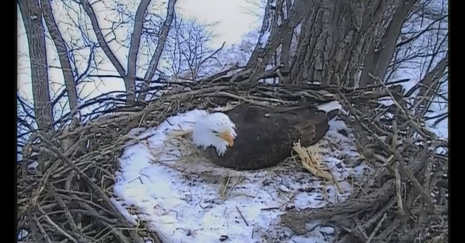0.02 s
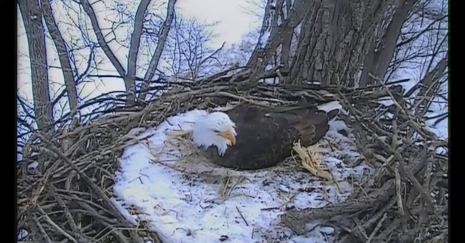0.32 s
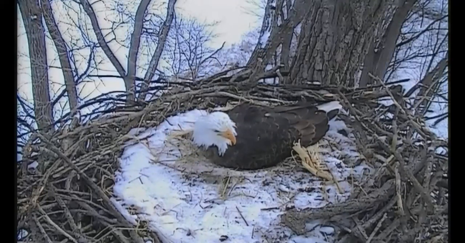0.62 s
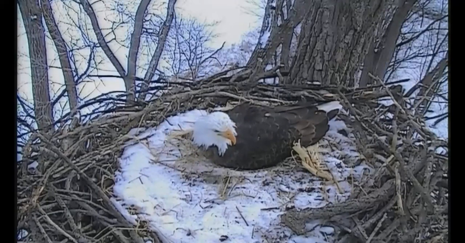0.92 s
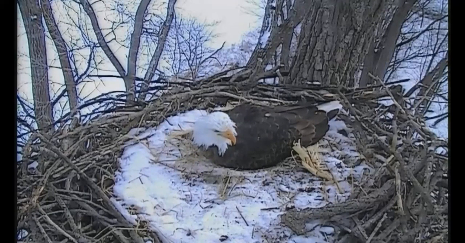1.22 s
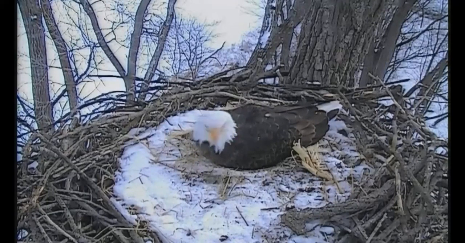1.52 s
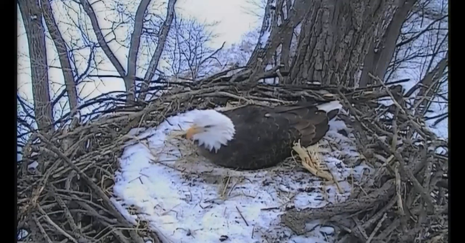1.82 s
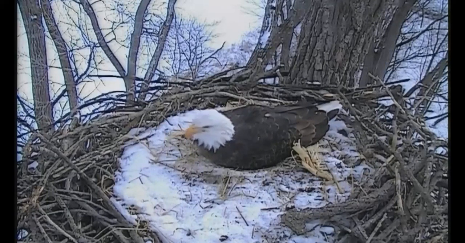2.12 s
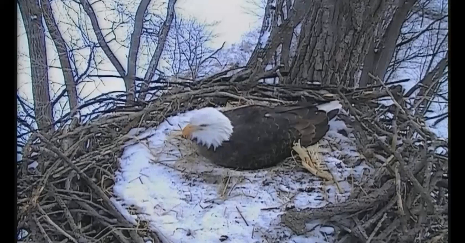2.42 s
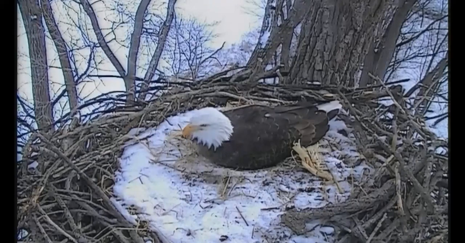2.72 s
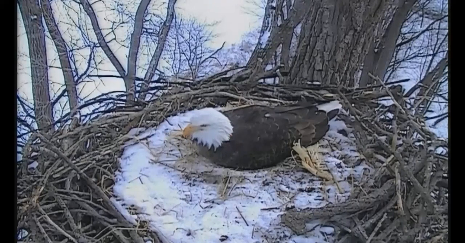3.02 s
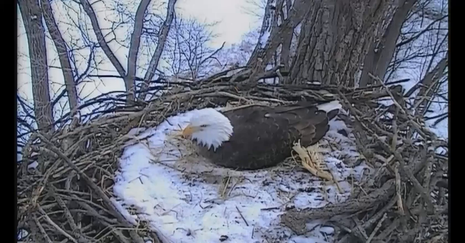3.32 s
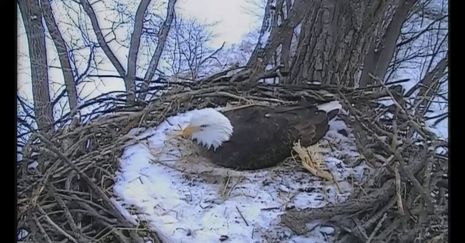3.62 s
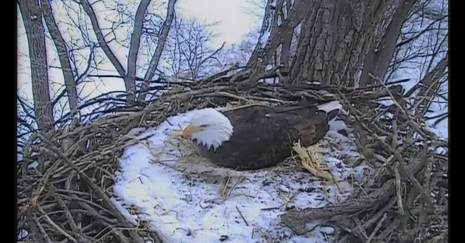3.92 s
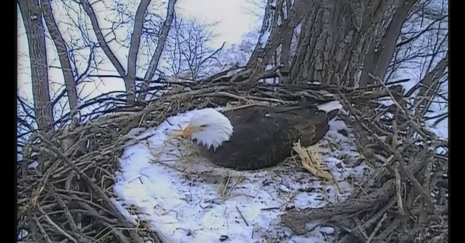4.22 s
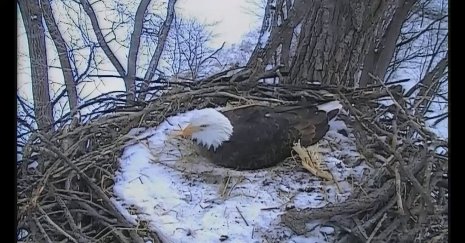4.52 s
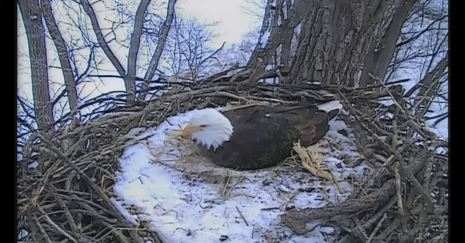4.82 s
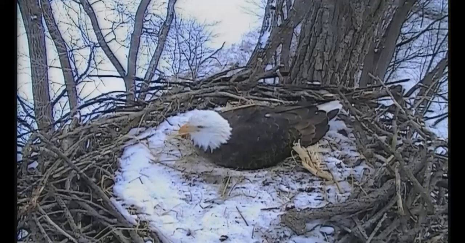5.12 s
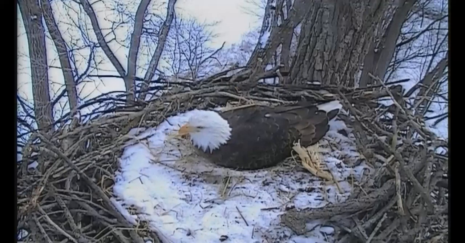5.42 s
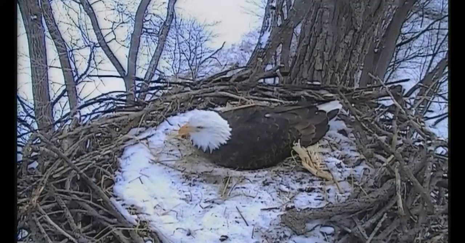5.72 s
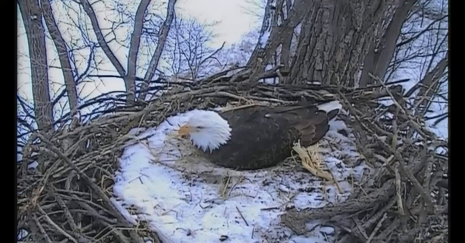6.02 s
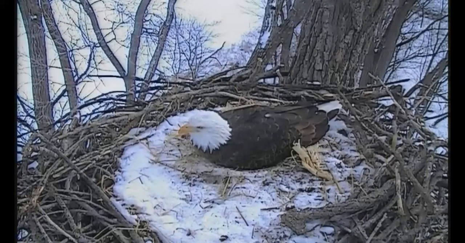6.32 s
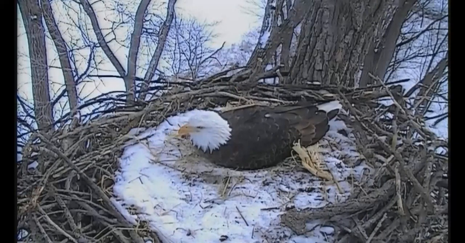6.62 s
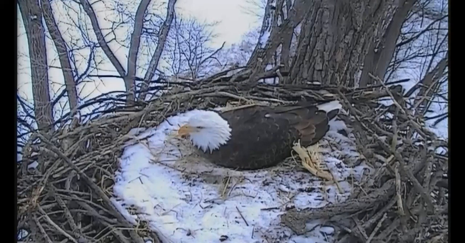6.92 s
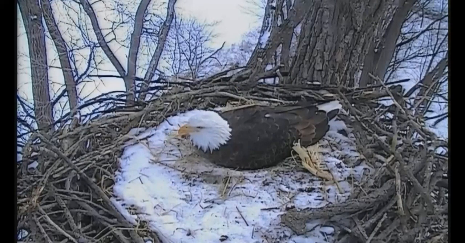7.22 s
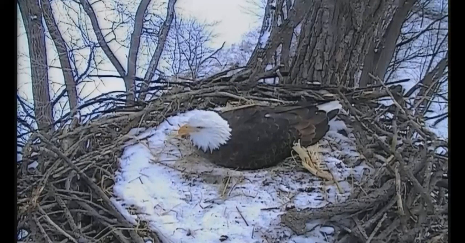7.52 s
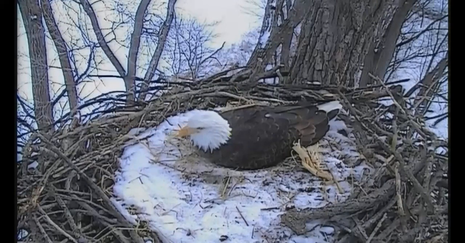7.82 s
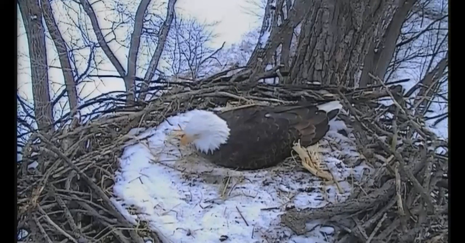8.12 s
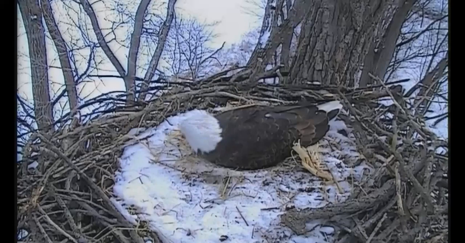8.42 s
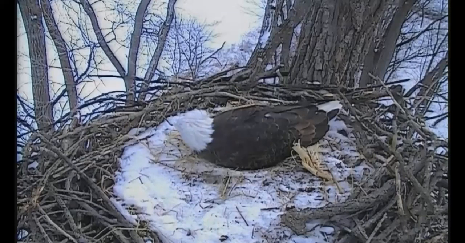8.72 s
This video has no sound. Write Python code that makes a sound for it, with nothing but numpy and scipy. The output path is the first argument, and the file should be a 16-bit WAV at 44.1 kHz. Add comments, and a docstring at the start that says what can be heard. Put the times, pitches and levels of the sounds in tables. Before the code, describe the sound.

Faint, high songbird chirps and a repeated husky phrase come from the woods around a treetop nest, then thin out. Later a far bird repeats falling calls, a knock sounds on wood, and a nearer bird briefly whistles, trills and rasps. Distant road noise and an engine drone swell gently underneath. The fixed microphone adds a constant low buzz, a thin whine and hiss, and the birds stay quiet against them.

```python
"""Songbirds over far traffic, with camera buzz.

Small birds whistle, trill, chirp and rasp in echoing trees; two soft taps ring in wood.
Far traffic roars and one distant engine drones. A camera's picture signal leaks into its sound
line: a low buzz at the field rate and a thin whine chopped at that rate, over mains hum and hiss."""
import sys
import numpy as np
from scipy import signal
from scipy.fft import rfft, irfft, next_fast_len
from scipy.io import wavfile
from scipy.ndimage import uniform_filter1d, map_coordinates

SR = 44100
rng = np.random.default_rng(int(sys.argv[2]) if len(sys.argv) > 2 else 0)


def output_pcm(signal):
    """Save a mono or channel-first signal as 16-bit PCM at the path in sys.argv[1].

    Samples are clipped to [-1, 1] before scaling.
    """
    pcm = np.clip(np.atleast_2d(signal).T, -1, 1) * 32767
    wavfile.write(sys.argv[1], SR, np.round(pcm).astype(np.int16))


N = 396018
TIME_S = np.arange(N) / SR
FIELD_HZ, MAINS_HZ = 59.94, 59.97

# One curve per whistle. Each row: time in seconds, pitch in Hz, level in dB.
WHISTLE_CURVES = [
    [(0.0, 7370, -62), (0.004, 7228, -64), (0.022, 7173, -51), (0.09, 7313, -49), (0.105, 7173, -54)],
    [(7.082, 7553, -65), (7.088, 7625, -53), (7.136, 7630, -50), (7.17, 8340, -46), (7.186, 8350, -37),
     (7.354, 8366, -59), (7.36, 8354, -62)],
    [(7.148, 6000, -60), (7.158, 5881, -43), (7.174, 5401, -48), (7.206, 5277, -53), (7.236, 5390, -58)],
    [(7.392, 4930, -61), (7.406, 5100, -48), (7.488, 5900, -45), (7.51, 5986, -54), (7.62, 6074, -49)],
    [(7.455, 10800, -58), (7.477, 10373, -49), (7.543, 9700, -50), (7.587, 10100, -46.5),
     (7.611, 9758, -46), (7.62, 9600, -61)],
]
# Trill and its lower side tone. Each row: pitch in Hz, level in dB.
TRILL_TONES = [(6000, -55), (4650, -59)]
# Bird rasps. Each row: start in seconds, level in dB.
RASP_TICKS = [(3.817, -54), (7.048, -42.5), (7.236, -44.5), (7.661, -44)]
RASP_HISSES = [(1.63, -61), (2.04, -66), (7.15, -57), (7.71, -56), (7.88, -55.5), (8.06, -58)]
# Rasp colours. Each row: frequency in Hz, gain in dB.
THROAT_SPECTRUM = [(1200, -3), (2700, -15), (3500, -3), (4500, -2), (5600, -6.5), (6500, -15), (9000, -32)]
SIBILANCE_SPECTRUM = [(3000, -40), (6500, -9), (8200, -1), (10000, 3), (11000, -8)]
# Each row: start and length in seconds, first and last pitch in Hz, relative dB, roughness as a share.
CHIRP_NOTES = [(.097, .025, 7400, 6500, -54, .01), (.97, 0.061, 2170, 2200, -57, .006),
               (1.92, .045, 8350, 8380, -55, .006), (1.92, .045, 9400, 9550, -59, .01),
               (1.976, .055, 5000, 6000, -49, .015), (2.05, .06, 7600, 8800, -58, .04),
               (2.075, .06, 6300, 7100, -55, .03), (2.48, .06, 4400, 5300, -63, .03),
               (7.364, 0.0088, 5800, 5250, -44, .006), (7.619, .036, 6400, 7850, -46, .008)]
# Each row: delay and length in seconds, first and last pitch in Hz, relative level in dB.
PHRASE_NOTES = [(0, .05, 4300, 5450, -9), (.03, .05, 6900, 8450, -7.5), (.07, .047, 4400, 3850, -1.5),
                (.13, 0.035, 3480, 3170, -6)]
# Each row: start in seconds, relative level in dB.
PHRASE_REPEATS = [(.451, -56), (1.048, -52.5), (1.628, -56)]
# Runs of falling calls. Each row: start, end and spacing in seconds, relative level in dB.
FAR_CALL_RUNS = [(5.74, 6.7, .175, -60), (7.11, 7.85, .3, -63)]
# Single falling calls. Each row: start in seconds, first pitch in Hz, level in dB.
FAR_SINGLE_CALLS = [(.3, 2830, -64), (5.01, 3500, -65), (5.46, 3560, -57), (8.34, 2713, -62)]
# Each row: start in seconds, ring in Hz, level in dB, 60 dB decay time in seconds.
WOOD_TAPS = [(3.826, 1270, -36, 0.077), (7.333, 587, -16, .035)]
# Traffic swell. Each row: time in seconds, tyre level in dB.
TYRE_LEVELS = [(0, -32), (.6, -34.5), (2.9, -37), (4.3, -35.5), (6.1, -31), (6.8, -35.5), (7.4, -34),
               (8.1, -31), (9, -32)]
# Traffic colours. Each row: frequency in Hz, gain in dB.
RUMBLE_SPECTRUM = [(4, -20), (10, -18.5), (20, 2), (32, 12), (45, -3), (75, 8), (130, -2.5), (300, -43.5)]
ROAR_SPECTRUM = [(40, -19), (130, 0), (230, 0), (420, 0.5), (500, -6), (700, -12.5), (1200, -29),
                 (2500, -41.5), (6000, -73)]
TYRE_SPECTRUM = [(250, -31), (430, -13.5), (500, -1.5), (560, -0.5), (680, -4.5), (800, -12), (950, -17.5),
                 (1200, -23.5), (1500, -34.5), (2500, -45), (6000, -70)]
# Each row: time in seconds, firing rate in Hz, level in dB.
ENGINE_CURVE = [(0, 100.5, -32.5), (1.4, 99.76, -37), (2.25, 95.27, -32), (3.6, 88.5, -32),
                (4.5, 87.5, -38.5), (6.6, 86, -38.5), (8.2, 93.7, -33.5), (9, 94, -33)]
# Picture signal's path into the sound line. Each row: frequency in Hz, gain in dB.
LEAK_RESPONSE = [(15, -28), (60, 0), (120, 0), (180, -5.5), (240, -6), (360, -10.5), (540, -12), (760, -18),
                 (1150, -14.5), (1600, -29.5), (2050, -22.5), (2800, -26.5), (4200, -21.5), (5200, -24.5),
                 (10000, -24.5)]
# Brightness down the picture. Each row: time from blanking onset in ms, relative gain.
SCAN_BRIGHTNESS = [(.7, 0.081), (1.1, 0.68), (3.2, 1), (5.5, 0.77), (6.3, 0.17), (7.5, 0.58), (10, 0.42),
                   (10.8, 0.79), (11.8, 0.41), (12.4, 0.42), (13.3, 0.76), (14.2, 0.27)]
# Each row: harmonic number, level in dB.
MAINS_HARMONICS = [(1, -39), (3, -38.5), (5, -52)]
# Each row: frequency in Hz, gain in dB.
LINE_HISS_SPECTRUM = [(300, 4), (1700, 4), (2050, 5.5), (2600, 0), (3300, 2), (3800, -1), (4250, -0.5),
                      (4800, -3), (6000, -2.5), (7300, -3.5), (8400, -6), (9900, -4.5), (11000, -13.5)]


def whistles():
    """Near bird: thin notes that glide and hold, often two at once."""
    song = np.zeros(N)
    for curve in WHISTLE_CURVES:
        times_s, hz, db = np.transpose(curve)
        t = np.arange(times_s[0], times_s[-1], 1 / SR)
        tone = note(np.interp(t, times_s, hz), rough=.006, flutter_db=2, taper=.065, husk=.33)
        add(song, times_s[0], amp(np.interp(t, times_s, db)) * tone)
    return song


def trill(start_s=7.51, length_s=.115, pulse_hz=70):
    """End of the rising whistle: two rough tones pulsing together."""
    song = np.zeros(N)
    t = np.arange(int(length_s * SR)) / SR
    pulsing = unit(1 - np.cos(2 * np.pi * pulse_hz * t))
    for hz, db in TRILL_TONES:
        add(song, start_s, amp(db) * pulsing * note(np.full(len(t), hz), rough=.025))
    return song


def rasps():
    """Noise puffs: dry ticks mostly from the throat, longer hisses mostly sibilance."""
    tick = bursts(RASP_TICKS, length_s=.032, grain_db=2)
    hiss = bursts(RASP_HISSES, length_s=.11, grain_db=4.5)
    throat = (tick + amp(-12) * hiss) * noise(THROAT_SPECTRUM, patchy_db=-3)
    sibilance = (hiss + amp(-8) * tick) * noise(SIBILANCE_SPECTRUM, patchy_db=-2.5)
    return throat + sibilance


def chirps(gain_db=-.5):
    """Quick slides that settle, some clear, some hoarse."""
    song = np.zeros(N)
    for start_s, length_s, first_hz, last_hz, db, rough in CHIRP_NOTES:
        hz = slide(length_s, first_hz, last_hz, bend=1.9)
        add(song, start_s, amp(db + gain_db) * note(hz, rough))
    return song


def phrases(gain_db=1.5):
    """A repeated husky phrase: two notes up, two down."""
    song = np.zeros(N)
    for start_s, phrase_db in PHRASE_REPEATS:
        for delay_s, length_s, first_hz, last_hz, note_db in PHRASE_NOTES:
            hz = slide(length_s, first_hz, last_hz, bend=1.2)
            add(song, start_s + delay_s, amp(phrase_db + note_db + gain_db) * note(hz, rough=.041))
    return song


def single_calls():
    """Lone, shallow slurs from other trees."""
    song = np.zeros(N)
    for start_s, first_hz, db in FAR_SINGLE_CALLS:
        add(song, start_s, amp(db) * slur(first_hz, fall=.16, length_s=.06, rough=.006))
    return song


def far_bird(first_hz=2250, gain_db=-1):
    """Evenly spaced runs of one rough, falling slur."""
    song = np.zeros(N)
    for start_s, end_s, spacing_s, db in FAR_CALL_RUNS:
        for call_s in np.arange(start_s, end_s, spacing_s):
            add(song, call_s, amp(db + gain_db) * slur(first_hz, fall=.22, length_s=.098, rough=.035))
    return song


def note(hz, rough, flutter_db=2.5, taper=.25, husk=.48):
    """Bird tone of rms 1 along a pitch path, with jitter, flutter and husky sidebands."""
    n = len(hz)
    phase = 2 * np.pi * np.cumsum(hz * (1 + rough * wobble(910, n))) / SR
    tone = np.sin(phase) + husk * wobble(1000, n) * np.cos(phase)
    flutter = amp(flutter_db * wobble(112, n))
    return unit(tone * signal.windows.tukey(n, taper) * flutter)


def slide(length_s, first_hz, last_hz, bend):
    """Pitch path in Hz; a bend over 1 starts fast and levels off."""
    return last_hz + (first_hz - last_hz) * np.linspace(1, 0, int(length_s * SR)) ** bend


def slur(first_hz, fall, length_s, rough):
    """Soft call that swells and fades as its pitch falls by a share."""
    n = int(length_s * SR)
    hz = first_hz * np.linspace(1, 1 - fall, n) * (1 + rough * wobble(196, n))
    return unit(np.hanning(n) * np.sin(2 * np.pi * np.cumsum(hz) / SR))


def bursts(events, length_s, grain_db):
    """Envelope of grainy puffs."""
    envelope, n = np.zeros(N), int(length_s * SR)
    for start_s, db in events:
        puff = signal.windows.tukey(n, .5) * amp(grain_db * wobble(360, n))
        add(envelope, start_s, amp(db) * unit(puff))
    return envelope


def woods(x, wet_db, t60_s, onset_s=.01):
    """Add the short echo scattered by trunks and branches."""
    t = np.arange(SR // 2) / SR
    tail = rng.standard_normal(len(t)) * amp(-60 * t / t60_s) * (1 - np.exp(-t / onset_s))
    return x + amp(wet_db) * signal.fftconvolve(x, tail / np.linalg.norm(tail))[:N]


def taps(attack_s=.001):
    """Each light knock rings one fast-dying note in wood."""
    track, t = np.zeros(N), np.arange(SR // 4) / SR
    for start_s, hz, db, t60_s in WOOD_TAPS:
        envelope = amp(db - 60 * t / t60_s) * (1 - np.exp(-t / attack_s))
        add(track, start_s, envelope * np.sin(2 * np.pi * hz * t))
    return track


def traffic(rumble_db=-38, growth_db_per_s=.17, roar_db=-34, doppler_shift=.14, settle_s=1.4):
    """Far road: rumble grows, roar and tyres swell together, tyre pitch sinks as a vehicle passes."""
    tyre_db, = curves(TYRE_LEVELS)
    doppler = 1 + doppler_shift * np.exp(-TIME_S / settle_s)
    tyres = map_coordinates(noise(TYRE_SPECTRUM, patchy_db=1.53), [np.cumsum(doppler)], mode="mirror")
    rumble_gain = amp(rumble_db + growth_db_per_s * TIME_S + .8 * wobble(4))
    rumble = rumble_gain * noise(RUMBLE_SPECTRUM, patchy_db=1.5)
    swell_db = .39 * (tyre_db - tyre_db.mean())
    roar = amp(roar_db + swell_db) * noise(ROAR_SPECTRUM, patchy_db=1.67)
    return rumble + roar + amp(tyre_db + .38 * wobble(7)) * tyres


def engine(waver_db=1):
    """Distant engine: only the firing tone carries; it sags and picks up."""
    hz, db = curves(ENGINE_CURVE)
    firing = np.sqrt(2) * np.sin(2 * np.pi * np.cumsum(hz) / SR)
    return amp(db + waver_db * wobble(4.24)) * firing


def buzz(level_db=-26, blanking_ms=1.086, lead_samples=8192):
    """One blanking pulse per picture field, rounded by the line to a thump with two ticking edges."""
    ms = field_ms(np.arange(-lead_samples, N) / SR)
    sample_ms = 1000 / SR
    pulses = np.clip(np.minimum(ms, blanking_ms - ms) / sample_ms, 0, 1)
    leaked = signal.fftconvolve(pulses - pulses.mean(), minimum_phase(LEAK_RESPONSE))
    return amp(level_db) * unit(leaked[lead_samples:lead_samples + N])


def mains_hum(in_step_s=6.25, lag_s=.0081):
    """Hum just above the field rate, drifting slowly into step with the buzz."""
    crest_s = round(in_step_s * FIELD_HZ) / FIELD_HZ + lag_s
    phase = 2 * np.pi * MAINS_HZ * (TIME_S - crest_s)
    return np.sqrt(2) * sum(amp(db) * np.cos(harmonic * phase) for harmonic, db in MAINS_HARMONICS)


def whine(pitch_hz=6315.72, beat_hz=.317, scan_db=-46.5, steady_db=-55, beat_peak_s=2.61):
    """High tone chopped by the scanned brightness, beating against a weaker steady tone."""
    chop = unit(np.interp(field_ms(TIME_S), *np.transpose(SCAN_BRIGHTNESS)))
    t = TIME_S - beat_peak_s
    scanned = amp(scan_db) * chop * np.cos(2 * np.pi * pitch_hz * t)
    steady = amp(steady_db) * np.cos(2 * np.pi * (pitch_hz + beat_hz) * t)
    return np.sqrt(2) * (scanned + steady)


def line_hiss(hiss_db=-52, whistle_db=-69, whistle_hz=4205):
    """Steady hiss with a faint electrical whistle."""
    whistle = np.sqrt(2) * np.sin(2 * np.pi * whistle_hz * TIME_S)
    return amp(hiss_db) * noise(LINE_HISS_SPECTRUM, patchy_db=2) + amp(whistle_db) * whistle


def field_ms(time_s, first_pulse_s=.00728):
    """Time since the last blanking pulse began."""
    return 1000 * ((time_s - first_pulse_s) % (1 / FIELD_HZ))


def amp(db):
    """Decibels to gain."""
    return 10 ** (np.asarray(db) / 20)


def unit(x):
    """Scale to rms 1."""
    return x / np.sqrt(np.mean(x ** 2) + 1e-20)


def gain_at(spectrum, hz):
    """Linear gain from (Hz, dB) rows on a log frequency axis."""
    knots_hz, db = np.transpose(spectrum)
    return amp(np.interp(np.log(hz + 1), np.log(knots_hz + 1), db))


def curves(rows):
    """One value per sample for each column after the time."""
    times_s, *columns = np.transpose(rows)
    return [np.interp(TIME_S, times_s, column) for column in columns]


def wobble(knots_per_s, n=N):
    """Smooth random curve."""
    knots = rng.standard_normal(int(n * knots_per_s / SR) + 4)
    return map_coordinates(knots, [np.arange(n) * knots_per_s / SR])


def filtered(x, response):
    """Zero-phase filter; response maps Hz to gain."""
    n = next_fast_len(N + SR // 2)
    return irfft(rfft(x, n) * response(np.fft.rfftfreq(n, 1 / SR)), n)[:N]


def noise(spectrum, patchy_db):
    """Coloured noise of rms 1 with random gain patches in time and frequency."""
    bins = signal.stft(rng.standard_normal(N), nperseg=1024)[2]
    patches = uniform_filter1d(rng.standard_normal(bins.shape), size=5, axis=0)
    patches = uniform_filter1d(patches, size=12, axis=1)
    patchy = signal.istft(bins * amp(patchy_db * unit(patches)), nperseg=1024)[1][:N]
    return unit(filtered(patchy, lambda hz: gain_at(spectrum, hz)))


def minimum_phase(spectrum, n=16384):
    """Causal impulse response of the given colour."""
    cepstrum = irfft(np.log(gain_at(spectrum, np.fft.rfftfreq(n, 1 / SR))))
    cepstrum[1:n // 2] *= 2
    cepstrum[n // 2 + 1:] = 0
    return irfft(np.exp(rfft(cepstrum)))[:n // 2]


def add(track, start_s, x):
    """Mix x into the track in place."""
    part = track[round(start_s * SR):][:len(x)]
    part += x[:len(part)]


def scene():
    """Mono mix of outdoors and line noise; farther birds carry more echo."""
    near = woods(whistles() + trill() + rasps(), wet_db=-8, t60_s=.43)
    middle = woods(chirps() + phrases() + single_calls(), wet_db=-5, t60_s=.44)
    far = woods(far_bird(), wet_db=-2.5, t60_s=.5)
    outdoors = near + middle + far + taps() + traffic() + engine()
    return (outdoors + buzz() + mains_hum() + whine() + line_hiss())[None]


def record(dry):
    """The camera's band limit: a steep low-pass."""
    cutoff_hz = 10750
    return filtered(dry[0], lambda hz: 1 / np.sqrt(1 + (hz / cutoff_hz) ** 110))[None]


dry = scene()
out = record(dry)
output_pcm(out)
```